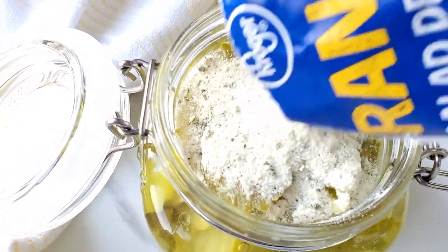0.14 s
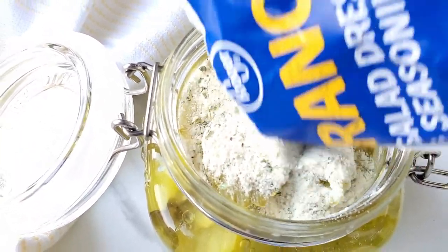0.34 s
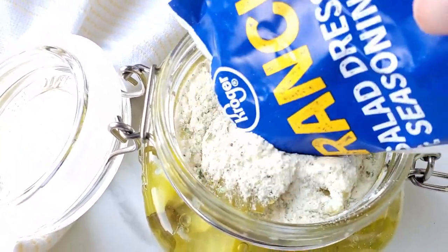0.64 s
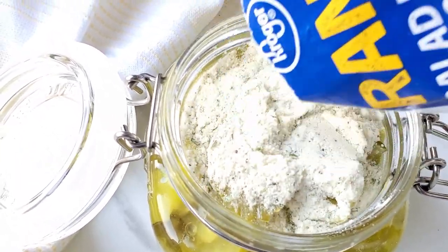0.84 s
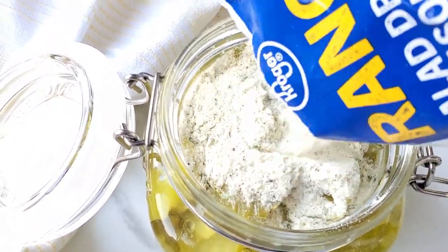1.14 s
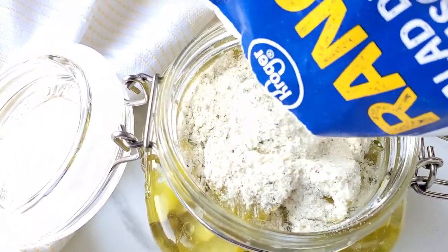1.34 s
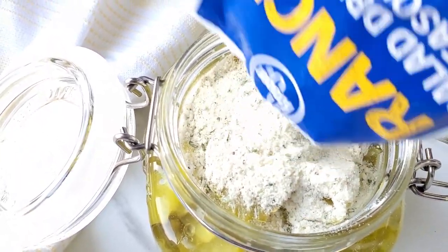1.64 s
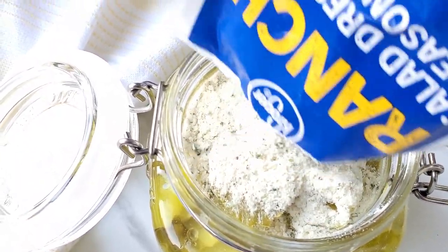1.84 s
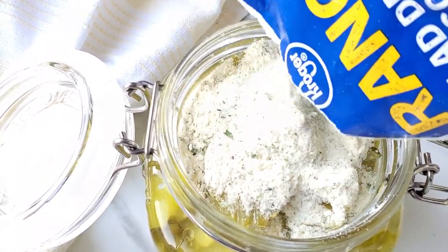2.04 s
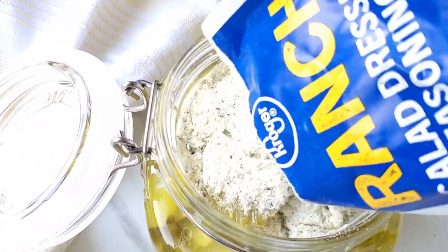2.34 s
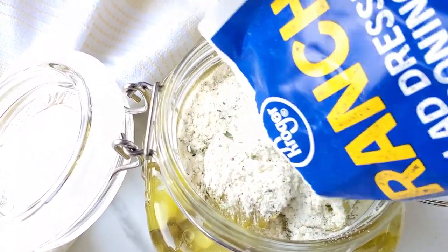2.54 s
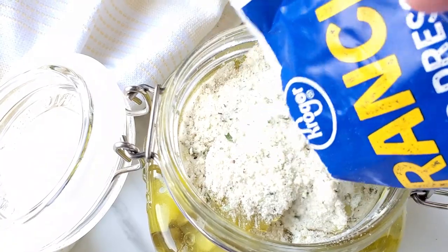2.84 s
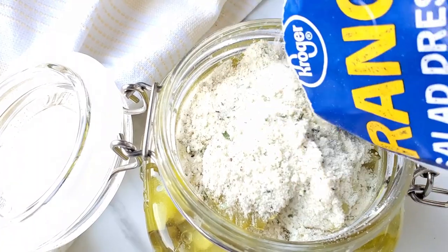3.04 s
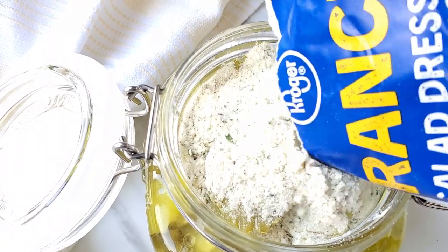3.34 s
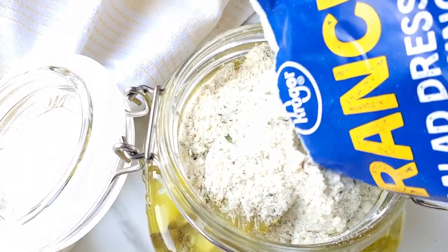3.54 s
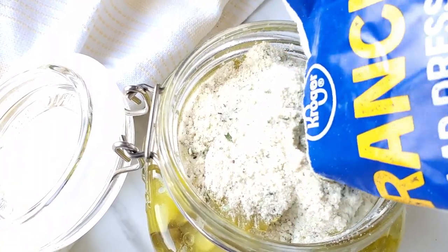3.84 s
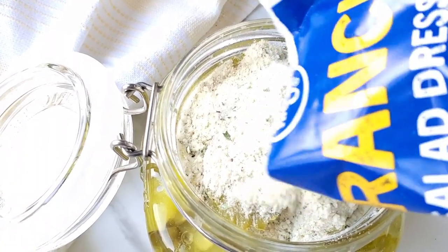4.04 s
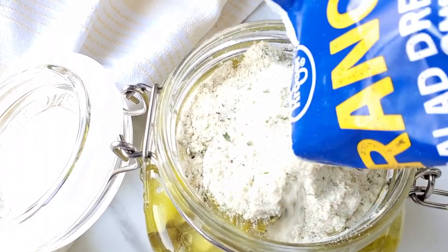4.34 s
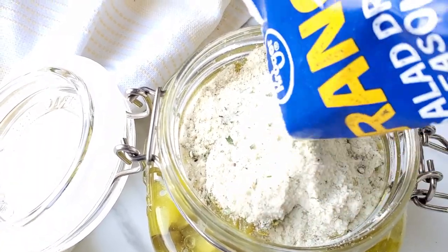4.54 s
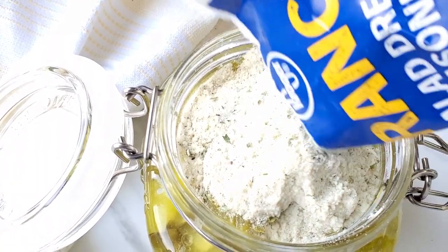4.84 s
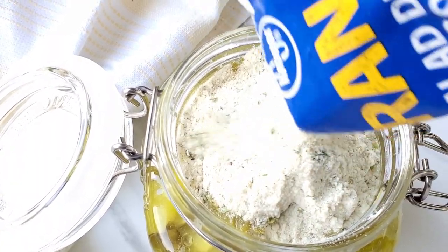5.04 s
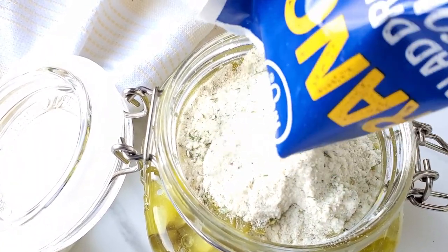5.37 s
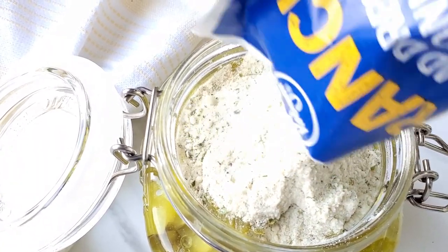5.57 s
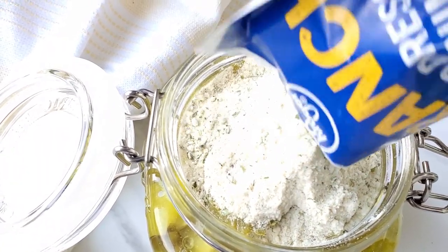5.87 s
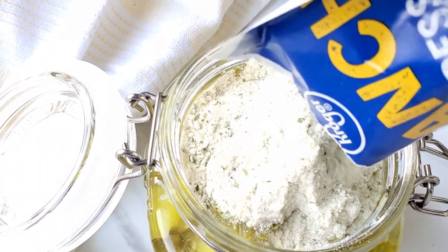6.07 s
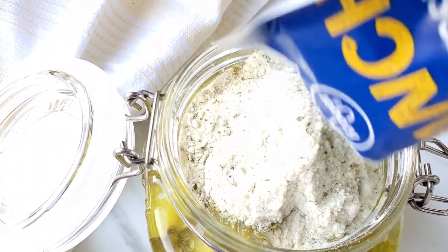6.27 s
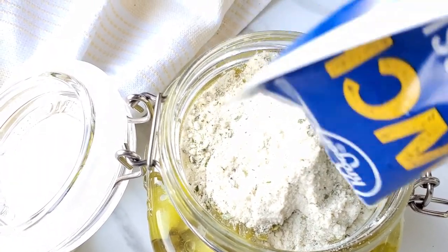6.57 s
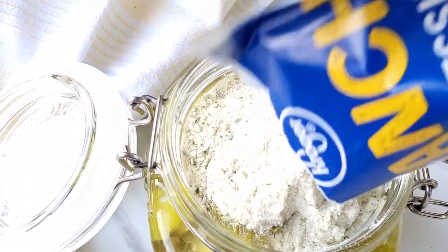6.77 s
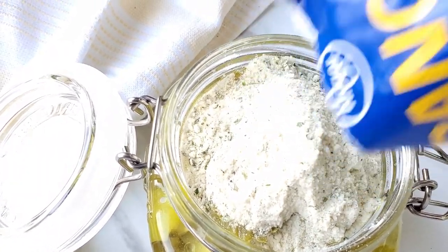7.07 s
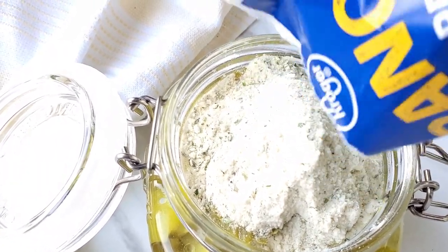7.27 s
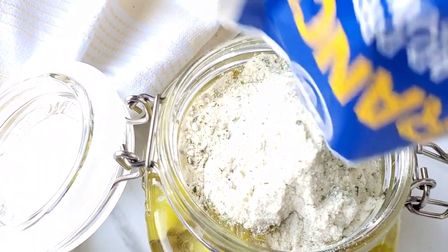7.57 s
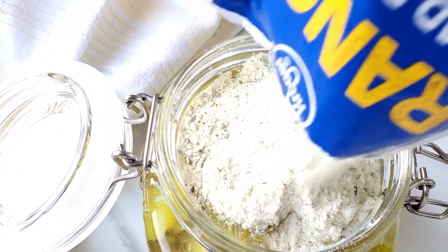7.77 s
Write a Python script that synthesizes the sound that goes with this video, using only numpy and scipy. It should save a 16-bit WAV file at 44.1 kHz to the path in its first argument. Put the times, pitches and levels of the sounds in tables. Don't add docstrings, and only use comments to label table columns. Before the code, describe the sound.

Crisp foil rustling, sharp creases popping and fine powder sliding in short rushes, very close, with a faint low hum of a kitchen behind.

```python
import sys
import numpy as np
from scipy import signal
from scipy.fft import rfft, irfft, next_fast_len
from scipy.io import wavfile
from scipy.ndimage import uniform_filter1d

SR = 44100
rng = np.random.default_rng(int(sys.argv[2]) if len(sys.argv) > 2 else 0)


def transcribe(signal):
    frames = np.atleast_2d(signal).T
    limited = np.clip(frames, -1, 1)
    pcm = np.round(limited * 32767).astype(np.int16)
    wavfile.write(sys.argv[1], SR, pcm)


def gain_from_decibels(decibels):
    exponent = np.asarray(decibels, float) / 20
    return 10 ** exponent


N = 348734


def at_hz(points, hz):
    table_hz, value = np.transpose(points)
    return np.interp(np.log(hz + 1e-9), np.log(table_hz), value)


def in_time(points):
    s, value = np.transpose(points)
    return np.interp(np.arange(N) / SR, s, value)


def rms_one(x):
    return x / np.sqrt(np.mean(x ** 2) + 1e-20)


def drift(rate_hz):
    r = np.exp(-2 * np.pi * rate_hz / SR)
    noise = rng.standard_normal(N + SR)
    return rms_one(signal.lfilter([1], [1, -2 * r, r * r], noise)[SR:])


def coloured(x, points):
    size = next_fast_len(x.shape[-1])
    gain = gain_from_decibels(at_hz(points, np.fft.rfftfreq(size, 1 / SR)))
    return irfft(rfft(x, size) * gain, size)[..., :x.shape[-1]]


def resonate(x, modes):
    out = 0
    for k, (hz, width_hz, db) in enumerate(modes):
        r = np.exp(-np.pi * width_hz / SR)
        poles = [1, -2 * r * np.cos(2 * np.pi * hz / SR), r * r]
        out = out + (-1) ** k * gain_from_decibels(db) * signal.lfilter([1 - r * r, 0, r * r - 1], poles, x)
    return out


def ridge(x, pitch_hz, width_hz=120):
    turn = np.exp(2j * np.pi * np.cumsum(pitch_hz) / SR)
    r = np.exp(-2 * np.pi * width_hz / SR)
    return rms_one((signal.lfilter([1], [1, -2 * r, r * r], x / turn) * turn).real)


def grains(per_s, spread_db, clump_db):
    born = rng.random(N) < per_s / SR
    size_db = spread_db * np.minimum(rng.exponential(1, N), 5) + clump_db * drift(34.6)
    return rms_one(born * gain_from_decibels(size_db) * rng.choice([-1, 1], N))


def strokes(rows, start_db_per_s, stop_db_per_s, still_db=-82):
    t, out = np.arange(0, N + 16, 16) / SR, still_db
    for s, length, first_db, last_db in rows:
        rise_s = abs(first_db - still_db) / start_db_per_s
        fall_s = abs(last_db - still_db) / stop_db_per_s
        times = [s - rise_s, s, s + length, s + length + fall_s]
        out = np.maximum(out, np.interp(t, times, [still_db, first_db, last_db, still_db]))
    return np.interp(np.arange(N) / SR, t, out)


# (frequency [Hz], density [dB per Hz])
ROOM_TONE = [(20, -34), (40, -4), (58, 8), (76, -3), (105, 5), (150, -5.5), (250, -12.5), (420, -21),
             (780, -24), (1500, -29), (2500, -32.5), (6400, -47), (15500, -47.5)]
# (frequency [Hz], likeness [0-1])
ROOM_ALIKE = [(60, .95), (130, 0.85), (300, .55), (1000, 0.1), (3000, 0.017)]


def kitchen(level_db=-54):
    size = next_fast_len(N, True)
    mid, side = rfft(coloured(rng.standard_normal((2, size)), ROOM_TONE))
    alike = np.clip(at_hz(ROOM_ALIKE, np.fft.rfftfreq(size, 1 / SR)), 0, 1)
    both = np.sqrt(1 + alike) * mid + np.sqrt(1 - alike) * side * [[1], [-1]]
    balance = gain_from_decibels([[0.3], [-0.3]])
    return gain_from_decibels(level_db) * rms_one(irfft(both, size)[:, :N]) * balance


# (time [s], length [s], start level [dB], end level [dB])
TRICKLES = [(0.0, 0.1, -66, -83), (0.196, .03, -57, -64), (0.512, 0.087, -52, -67),
            (1.492, 0.01, -60.5, -94), (2.162, 0.084, -60, -70), (2.459, 0.4, -46.5, -65.5),
            (2.915, 0.091, -51, -63.5), (3.014, 0.44, -62, -63), (3.563, 0.28, -64, -69),
            (4.933, 0.16, -46, -70), (5.115, .05, -54, -63), (5.205, 0.13, -48.5, -60),
            (5.405, 0.11, -58.5, -72), (5.563, .065, -76, -65.5), (5.896, 0.18, -49, -65),
            (6.331, 0.11, -63, -85), (7.042, 0.036, -64.5, -64), (7.356, 0.05, -58, -65),
            (7.435, 0.014, -52, -80), (7.55, .077, -52, -63), (7.737, 0.11, -45, -74),
            (7.888, 0.021, -65.5, -77)]
# (time [s], length [s], start level [dB], end level [dB])
RUSHES = [(.24, 0.035, -65, -46), (.295, 0.1, -53.5, -43), (.615, 0.17, -56.5, -53),
          (.85, 0.033, -58, -48.5), (1.064, 0.13, -51.5, -47.5), (1.27, 0.1, -57, -50.5),
          (1.6, 0.19, -80, -57), (1.705, 0.014, -52.5, -49.5), (1.81, 0.2, -43.5, -40),
          (2.02, .035, -50, -55), (2.27, 0.13, -69.5, -49), (3.45, 0.08, -62, -42), (3.87, .21, -78, -49.5),
          (4.08, 0.5, -59, -57), (4.7, .2, -61, -61), (2.4, .05, -54, -54), (4.59, 0.083, -50, -50),
          (4.82, 0.023, -53, -60), (4.9, .03, -59, -57), (5.345, 0.038, -64, -53), (5.66, 0.14, -75, -51.5),
          (5.84, 0.082, -63, -44.5), (6.11, 0.061, -79, -63.5), (6.5, 0.094, -76, -61),
          (6.625, 0.041, -78, -56), (6.79, 0.054, -71, -74), (6.94, .042, -86, -68.5),
          (7.17, 0.049, -95, -66), (7.5, 0.079, -61, -59), (7.63, 0.14, -57.5, -48)]


def powder_level():
    return strokes([*RUSHES, *TRICKLES], start_db_per_s=515, stop_db_per_s=368)


# (time [s], length [s], start level [dB], end level [dB])
GRIPS = [(.553, 0.054, -48, -64), (1.09, 0.043, -52.5, -56), (1.535, 0.034, -60, -77),
         (2.275, 0.048, -50.5, -48), (2.43, 0.25, -54, -53.5), (2.72, .13, -60, -60), (.95, .04, -66, -64),
         (2.903, 0.12, -49, -62), (3.085, 0.26, -56, -64), (3.32, 0.16, -61.5, -54), (3.55, .05, -47, -60),
         (3.6, .17, -71, -57), (3.92, 0.082, -60, -67), (4.063, 0.71, -57.5, -60), (4.3, 0.3, -57, -57),
         (4.78, 0.17, -61, -60), (5.02, 0.11, -63, -47), (5.224, 0.19, -46, -76),
         (5.573, 0.055, -60, -65.5), (5.72, 0.135, -67, -59), (5.925, 0.15, -48, -69.5),
         (6.148, 0.012, -62, -81), (6.322, .02, -62.5, -67), (6.567, .2, -51.5, -72.5),
         (6.834, 0.022, -59, -74), (6.96, .03, -68, -66), (7.11, .03, -66, -70), (7.4, .05, -57, -62)]
# (time [s], length [s], start level [dB], end level [dB])
PINCHES = [
    (3.519, .02, -42, -38),
    (6.972, .042, -62, -63),
    (7.028, .068, -57, -60),
    (7.262, .03, -66, -69),
    (7.335, .065, -55, -53),
    (7.431, .014, -53, -52),
    (1.055, .03, -54, -56),
    (2.452, .03, -52, -53),
]


def finger_level():
    grips_db = strokes(GRIPS, start_db_per_s=339, stop_db_per_s=274)
    pinches_db = strokes(PINCHES, start_db_per_s=4000, stop_db_per_s=1500)
    return np.maximum(grips_db, pinches_db)


# (frequency [Hz], density [dB per Hz])
HISS = [(3500, -7), (5000, -2.5), (7500, -5.5), (11000, -5), (15000, -3), (16000, -6)]
# (pitch [Hz], width [Hz], level [dB])
PANELS = [(400, 200, 5), (680, 250, 4), (1000, 250, 1)]
# (pitch [Hz], width [Hz], level [dB])
FOIL = [(1300, 730, -0.5), (1710, 480, -6.5), (1878, 230, -7), (2400, 210, -0.5), (2950, 460, -5),
        (3880, 726, -1), (4080, 377, -0.5), (5500, 460, -10), (6530, 820, -16)]
# (time [s], pitch [Hz])
TENSION = [(.45, 3050), (.553, 1620), (.62, 2900), (1.75, 3050), (1.9, 2500), (2.27, 1500), (2.38, 2950),
           (2.62, 2900), (2.95, 2450), (3.5, 2150), (4.1, 1960), (4.98, 1830), (5.43, 1900), (6.6, 1600),
           (6.95, 2300), (7.1, 2300), (7.36, 1600), (7.74, 2100)]


def rustle(shape_db=3.5, focus_db=2.0, follow=0.64):
    hiss_db, fingers_db, pitch_hz = powder_level(), finger_level(), in_time(TENSION)
    foil_db = np.maximum(hiss_db - 9.5, fingers_db)
    panel_db = np.maximum(fingers_db - foil_db, -28)
    grip_db = 1.2 * drift(30)
    hiss = rms_one(coloured(grains(14000, spread_db=3.5, clump_db=1.9), HISS))
    coarse, foil = grains(3500, spread_db=3.6, clump_db=2.1), 0
    for k, mode in enumerate([*PANELS, *FOIL]):
        weight_db = shape_db * drift(6.0) - focus_db * np.log2(mode[0] / pitch_hz) ** 2
        if k < len(PANELS):
            weight_db = weight_db + panel_db
        foil = foil + (-1) ** k * gain_from_decibels(weight_db) * resonate(coarse, [mode])
    foil /= np.sqrt(uniform_filter1d(foil ** 2, size=SR // 12) + 1e-9)
    foil = foil + gain_from_decibels(-6 + 4 * drift(12)) * ridge(coarse, pitch_hz)
    jerk_db = hiss_db - uniform_filter1d(hiss_db, size=SR // 10)
    return gain_from_decibels(grip_db) * (gain_from_decibels(hiss_db + 1.0) * hiss + gain_from_decibels(foil_db + 0.6 + follow * jerk_db) * foil)


# (time [s], peak level [dB], ring pitch [Hz], crack against peak [dB])
TICKS = [(0.162, -43, 1920, -6), (0.338, -37, 3000, -1), (0.522, -42, 3070, 5), (0.531, -25.5, 3940, 4),
         (1.182, -32.5, 3060, 3), (1.285, -43, 1600, 2), (1.318, -39.5, 3030, 2), (1.489, -48, 4420, -16),
         (1.536, -46.5, 3540, 6.5), (1.769, -42, 3100, 9), (1.799, -41, 2300, -3), (1.834, -35, 2610, -4),
         (2.402, -41, 2960, 13), (2.454, -38, 2570, 11), (3.209, -38, 2030, 15), (3.534, -19, 3500, 0),
         (3.828, -54, 2300, 13), (3.846, -46.5, 2400, 3), (4.642, -37.5, 4380, 6), (5.102, -21, 1966, 6),
         (5.561, -43, 2840, 0), (6.321, -41.5, 1310, 7), (6.371, -29, 1710, -12), (7.4, -36.5, 4470, -11),
         (7.679, -45.5, 1930, 19), (0.5345, -31, 4000, 3), (1.634, -50, 4200, 0), (1.675, -52, 2600, 0),
         (1.14, -42, 4300, -3), (1.784, -48, 3000, 10), (1.98, -36, 3100, 4), (1.89, -37, 3800, 2),
         (2.603, -42, 5200, 5), (1.398, -52, 6000, 5), (7.438, -27, 4700, 0), (4.2, -43, 4500, 3),
         (4.783, -48, 4800, 0), (5.934, -38, 5000, 0)]


def edge_ticks():
    return [(s, db, hz, -14, crack_db) for s, db, hz, crack_db in TICKS]


# (time [s],
# peak level [dB], ring pitch [Hz], panel thump against peak [dB])
RINGS = [(0.398, -35, 3430, -18), (0.409, -30.5, 3040, -20), (0.549, -20, 1350, -7), (0.996, -23, 2250, -2),
         (1.369, -34.5, 3020, -31), (1.945, -35.5, 2020, -40), (2.006, -26, 2690, -15),
         (2.558, -32, 3740, -10), (2.667, -26.5, 2360, -4), (2.88, -21, 2880, -8.5), (2.894, -19, 2670, -6),
         (2.901, -30, 2420, -3), (2.922, -22.5, 2350, -5), (3.065, -24, 2520, -2.5),
         (3.104, -21.5, 2310, -10), (3.149, -26.5, 2120, -8), (3.547, -20, 1300, -20),
         (3.5475, -23, 3200, -25), (3.529, -17, 1900, -20), (3.524, -28, 2000, -20),
         (5.124, -26, 2400, -15), (5.231, -27, 2900, -15), (5.2, -34, 2300, -20), (5.211, -29, 2500, -20),
         (5.22, -29, 2300, -20), (5.151, -32, 2400, -20), (5.247, -32, 2600, -20), (5.133, -27, 2600, -20),
         (2.906, -30, 2500, -20), (1.12, -38, 4300, -25), (7.351, -41, 1800, -20), (7.362, -38, 2000, -20),
         (7.388, -38, 4400, -20), (2.466, -41, 2500, -25), (6.972, -52, 2280, -25),
         (3.728, -42.5, 1300, -28), (4.047, -19, 2700, -21), (4.728, -40.5, 1730, 1),
         (7.3745, -31, 1550, -25), (7.434, -28, 1370, -15)]


def taut_creases():
    return [(*row, -31.5) for row in RINGS]


# (time [s], peak level [dB], ring pitch [Hz], panel thump against peak [dB])
CRUMPLES = [(0.565, -45, 1160, 17), (0.878, -30.5, 2190, -1), (1.815, -39.5, 2740, 11),
            (2.495, -35, 2710, -5), (2.832, -31, 1710, 5.5), (3.125, -50, 2100, 18), (3.226, -40, 2030, -2),
            (3.276, -58, 2010, 27), (3.385, -47, 1480, 16), (3.504, -14, 2750, -3), (3.922, -41, 1170, 5.5),
            (4.075, -39, 1220, 2), (4.089, -43.5, 1180, 12.5), (5.302, -20, 1930, -2.5),
            (5.357, -37, 1980, 8.5), (5.392, -40.5, 3060, 13.5), (5.465, -29.5, 2110, 10),
            (5.946, -22, 2870, 7.5), (6.124, -39.5, 1490, 8.5), (6.332, -34, 3550, -5),
            (6.544, -29, 1930, 0.5), (6.574, -50, 1750, 14), (6.59, -44.5, 3000, 11),
            (6.622, -40, 2780, 10.5), (6.682, -46.5, 2090, 10), (7.441, -23.5, 1560, -2)]


def crumples():
    return [(*row, 0) for row in CRUMPLES]


# (time [s], peak level [dB], ring pitch [Hz], panel thump against peak [dB])
FOLDS = [(1.105, -38, 1980, -4), (2.308, -36.5, 2100, 5), (2.526, -29.5, 1530, -1), (3.164, -36, 2040, 3),
         (3.243, -30, 2150, -5), (3.362, -27.5, 2160, -1), (3.687, -41.5, 1640, 9), (3.766, -32, 2950, 2),
         (3.781, -39.5, 1250, 2), (3.936, -29, 1980, -1.5), (4.042, -32.5, 2090, 5.5),
         (4.825, -28, 1900, -1), (4.926, -34.5, 1760, -4), (5.109, -19.5, 2540, 5.5),
         (5.228, -24, 2340, 6.5), (5.59, -40.5, 1680, 0), (5.693, -36.5, 1800, -1), (5.758, -39.5, 1930, 1),
         (5.896, -29, 2600, 5), (5.912, -20, 2850, 5), (6.012, -36.5, 1490, -6), (6.018, -31.5, 1940, 4.5),
         (6.818, -34.5, 1510, 4.5), (7.029, -40, 2400, -4), (7.057, -35.5, 2050, 4),
         (0.76, -49.5, 1500, 14)]


def soft_folds():
    return [(*row, -58) for row in FOLDS]


# (time [s], thump level [dB])
SLIPS = [(5.011, -20.5), (5.024, -17), (5.032, -20), (5.042, -18.5), (5.055, -20.5), (5.062, -19.5),
         (5.071, -18.5), (5.089, -19.5), (5.12, -19), (5.134, -17.5), (5.151, -17.5), (5.2, -18.5),
         (5.211, -21), (5.219, -19), (5.236, -21.5), (5.247, -22.5), (5.259, -23)]


def wringing(thump_db=19):
    return [(s, db - thump_db, 1930, thump_db, -8) for s, db in SLIPS]


def snaps(rise_s=0.00039, tail_db=-18.5):
    out, t = np.zeros(N + 4096), np.arange(4096) / SR
    bright = signal.butter(2, [5000, 13000], "band", fs=SR, output="sos")

    def fade(t60_s):
        return gain_from_decibels(-60 * t / t60_s) * (1 - np.exp(-t / rise_s))

    def tone(hz):
        return np.sin(2 * np.pi * hz * t)

    events = edge_ticks() + taut_creases() + crumples() + soft_folds() + wringing()
    for s, db, hz, thump_db, crack_db in events:
        chance, noise = rng.random(6), rng.standard_normal((3, len(t)))
        below, above = hz * (0.705 + 0.311 * chance[0]), hz * (1.22 + 0.413 * chance[1])
        ring = -tone(hz) - 0.45 * tone(below) - 0.4 * tone(above)
        ring_t60_s = min(30 / hz, 0.015)
        ring = fade(ring_t60_s) * (ring + 0.85 * resonate(noise[0], FOIL))
        push_hz, boom_hz = np.array([690, 390]) * (1 + 0.25 * (chance[2:4] - 0.5))
        push = -fade(0.009) * tone(push_hz)
        push = push - fade(0.0035) * tone(1260 * (0.7 + 0.6 * chance[4]))
        boom = -fade(0.024) * tone(boom_hz)
        crack = fade(0.0075) * signal.sosfilt(bright, noise[1])
        shiver = fade(0.15) * resonate(noise[2], FOIL)
        parts = ring + gain_from_decibels(thump_db) * push + gain_from_decibels(thump_db - 9.5) * boom
        parts = parts + gain_from_decibels(crack_db - 1.0) * crack + gain_from_decibels(tail_db) * shiver
        at = max(round((s - 0.0009) * SR), 0)
        out[at:at + len(t)] += gain_from_decibels(db) * parts
    return out[:N]


# (time [s], peak level [dB], pitch [Hz], decay t60 [s])
WOBBLES = [(1.814, -34, 300, .04), (2.262, -46, 520, .12), (2.277, -47, 1300, .12), (2.487, -38, 700, .06),
           (3.505, -21, 620, .03), (3.519, -28, 400, .03), (0.552, -32, 700, .04), (4.205, -46, 700, .03),
           (3.188, -38, 2400, .012), (4.973, -40, 3000, .012), (0.194, -44, 2500, .012),
           (2.706, -44, 2000, .015), (0.996, -30, 1150, .012), (2.3, -44, 900, .04),
           (3.116, -42, 5200, .006)]
# (time [s], peak level [dB])
CREEPS = [(4.451, -46), (4.478, -40), (4.4925, -39), (4.506, -35), (4.522, -36), (4.54, -34), (4.5515, -34),
          (4.565, -35), (4.577, -39), (4.597, -43), (4.611, -42), (4.618, -41), (4.628, -41), (4.637, -43),
          (4.644, -43), (4.651, -43), (4.668, -44)]


def wobbles(creep_hz=690, creep_t60_s=0.013):
    out, t = np.zeros(N + 8192), np.arange(8192) / SR
    creeps = [(s, db, creep_hz, creep_t60_s) for s, db in CREEPS]
    for s, db, hz, t60_s in [*WOBBLES, *creeps]:
        at = round((s - 1 / hz) * SR)
        swell = (1 - np.exp(-(1.5 * t * hz) ** 2)) * gain_from_decibels(-60 * (t - 1 / hz) / t60_s)
        out[at:at + len(t)] += gain_from_decibels(db) * swell * np.cos(2 * np.pi * hz * t)
    return out[:N]


# (frequency [Hz], share [0-1])
DIRECT = [(300, 0.75), (1500, 0.5), (3000, 0.06), (6000, 0.0446), (12000, 0.018)]
# (frequency [Hz], level [dB])
SHADOW = [(200, -16), (400, -6.5), (750, -11), (1300, -1.5), (2400, -3), (4400, -6.5), (7400, -6.5),
          (8400, -9.5), (9500, -9.5), (15000, -9.5)]


def microphones(x, scatter_t60_s=0.027, count=5, lag_s=0.0004134):
    size = next_fast_len(N + 2048)
    hz = np.fft.rfftfreq(size, 1 / SR)
    scatter = rng.standard_normal((count, 2048)) * gain_from_decibels(-60 * np.arange(2048) / SR / scatter_t60_s)
    scatter = rfft(scatter / np.linalg.norm(scatter, axis=1, keepdims=True), size)
    paths = np.array([drift(52) for _ in range(count)])
    paths = paths / np.linalg.norm(paths, axis=0)
    scattered = (rfft(x * paths, size) * scatter).sum(axis=0)
    direct = np.clip(at_hz(DIRECT, hz), 0, 1)
    far = np.sqrt(direct) * rfft(x, size) + np.sqrt(1 - direct) * scattered
    far = far * gain_from_decibels(at_hz(SHADOW, hz)) * np.exp(-2j * np.pi * hz * lag_s)
    return np.array([irfft(far, size)[:N], x])


def scene():
    room = kitchen()
    packet = rustle() + snaps() + wobbles()
    return microphones(packet) + room


def band_limit(x):
    return signal.sosfilt(signal.butter(12, 16820, fs=SR, output="sos"), x)


def record(dry):
    top = signal.cheby2(16, 45, 16150, fs=SR, output="sos")
    return band_limit(signal.sosfilt(top, dry))


dry = scene()
out = record(dry)
transcribe(out)
```